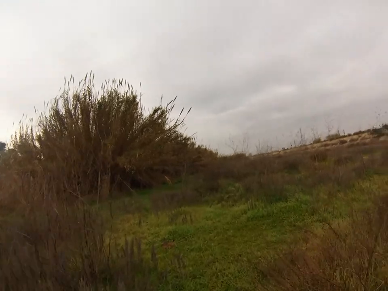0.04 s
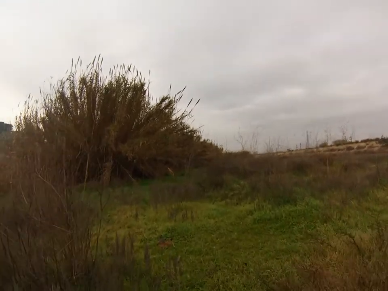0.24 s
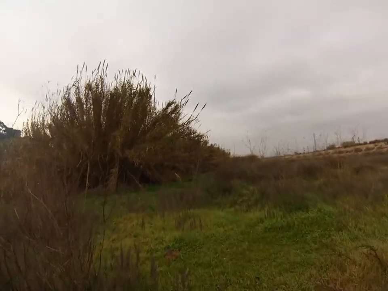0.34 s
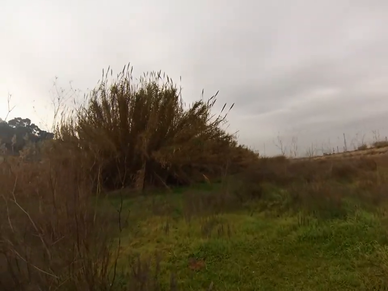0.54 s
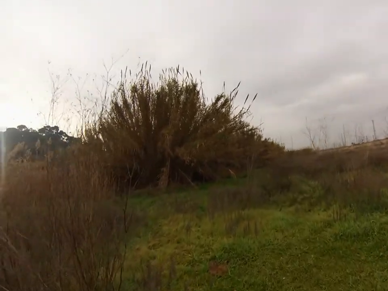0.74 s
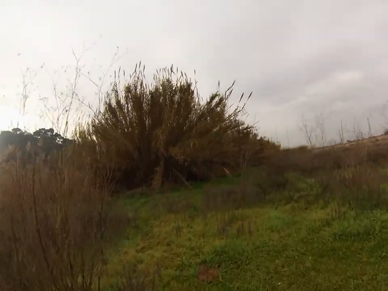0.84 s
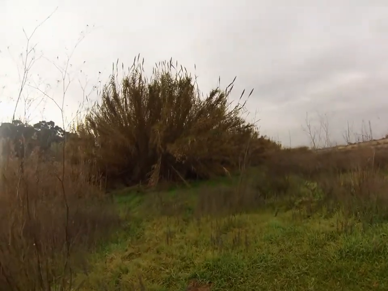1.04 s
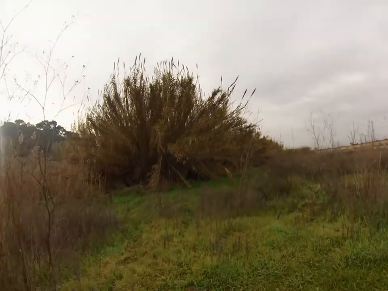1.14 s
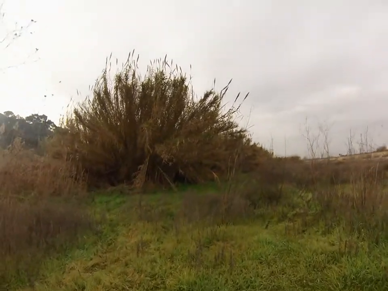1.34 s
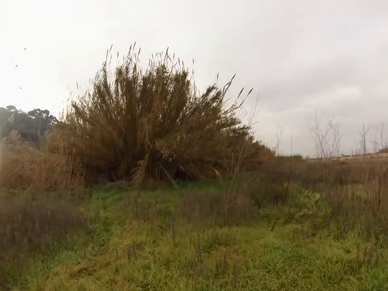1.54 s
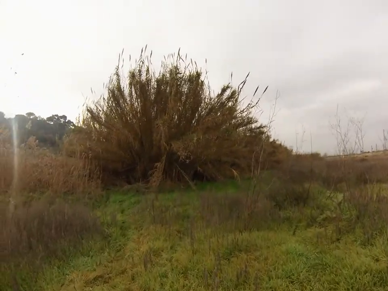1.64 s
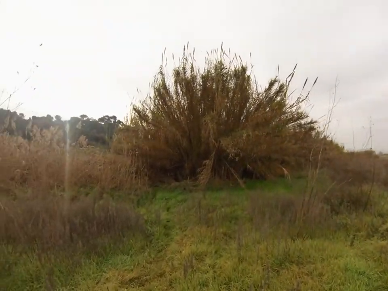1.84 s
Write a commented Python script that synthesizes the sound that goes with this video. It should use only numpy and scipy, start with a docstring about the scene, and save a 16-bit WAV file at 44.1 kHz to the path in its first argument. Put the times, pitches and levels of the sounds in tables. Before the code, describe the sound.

Soft wind rumbles on the microphone, swelling as someone walks slowly over grass in a quiet field. Dull bumps and light taps come from the handheld camera, then one sharp knock as the rumble dies down.

```python
"""Someone walks slowly over grass in a quiet field, carrying a small camera.
From the start, soft wind rumbles on the microphone over a faint, even hiss. With the first step the
grass swishes underfoot, the rumble swells with the sway, and the hand bumps dully on the camera's case.
Light taps then ring the case among further steps and bumps. Just after the last step comes one sharp
knock, and a few soft contacts follow as the rumble dies down."""
import sys
import numpy as np
from scipy import signal
from scipy.fft import rfft, irfft
from scipy.io import wavfile
from scipy.ndimage import uniform_filter1d

SR = 44100
rng = np.random.default_rng(int(sys.argv[2]) if len(sys.argv) > 2 else 0)


def dump(signal):
    """Clip the signal to [-1, 1] and save it as 16-bit WAV at the path in sys.argv[1]."""
    limited = np.clip(np.atleast_2d(signal).T, -1, 1)
    pcm = np.round(limited * 32767).astype(np.int16)
    wavfile.write(sys.argv[1], SR, pcm)


N = 83790


def amp(db):
    """The decibel scale: amplitude grows tenfold every 20 dB."""
    return 10 ** (np.asarray(db) / 20)


def unit(x):
    """Normalisation to an rms of 1."""
    return x / np.sqrt(np.mean(x ** 2) + 1e-20)


def add(mix, start_s, sound):
    """Superposition: a sound adds linearly to the mix from start_s on."""
    part = mix[max(round(start_s * SR), 0):][:len(sound)]
    part += sound[:len(part)]


def noise(spectrum):
    """An analytic noise signal of given spectrum: the real part is the sound, the modulus its envelope."""
    hz, db = np.transpose(spectrum)
    f = np.fft.rfftfreq(N, 1 / SR)
    white = rng.standard_normal(len(f)) + 1j * rng.standard_normal(len(f))
    gain = amp(np.interp(np.log(f + 1), np.log(hz + 1), db)) * (f > 0)
    analytic = np.fft.ifft(white * gain, N)
    return analytic / np.std(analytic.real)


def wander(hz):
    """Low-pass noise: a random drift of rms 1 that rolls off around hz."""
    f = np.fft.rfftfreq(N, 1 / SR)
    return unit(irfft(rfft(rng.standard_normal(N)) * np.exp(-(f / hz) ** 2), N))


def swell(peak_s, rise_s, fall_s):
    """A Gaussian envelope with separate widths before and after its peak."""
    t = np.arange(N) / SR - peak_s
    return np.exp(-(t / np.where(t < 0, rise_s, fall_s)) ** 2 / 2)


def eddies(spectrum):
    """Turbulent pressure of even strength: noise divided by its own smoothed envelope."""
    pressure = noise(spectrum)
    strength = np.sqrt(signal.fftconvolve(abs(pressure) ** 2, signal.windows.hann(SR // 16), "same"))
    return unit(pressure.real / strength)


def wind():
    """Turbulence on the microphone: a rumble swells with each stride, and each gust adds a push."""
    # buffeting by wind and sway: time_s, level_db
    buffet = [(0, -53), (.155, -53.5), (0.223, -21), (0.311, -31.5), (.36, -50.5), (.55, -51), (.65, -55.5),
              (.76, -43.5), (.825, -42), (0.879, -35), (.96, -33.5), (1.05, -38.5), (1.17, -56.5),
              (1.3, -50), (1.38, -46.5), (1.43, -49.5), (1.5, -34), (1.602, -30.5), (1.66, -52), (1.9, -60)]
    # spectrum of the deep rumble: frequency_hz, density_db
    rumble_spectrum = [(8, -7), (20, -0.5), (27, 0.5), (38, -14), (58, -36), (100, -41), (220, -59),
                       (500, -91.5)]
    # short gusts: peak_s, level_db, width_s, pitch_hz
    gusts = [(0.04, -50, 0.012, 48), (.105, -61, 0.012, 85.6), (.228, -37, 0.023, 49.5),
             (0.264, -50, 0.018, 44), (0.311, -61, 0.011, 72), (.396, -46, 0.012, 62),
             (0.499, -47.5, 0.021, 51.7), (0.741, -49, 0.0082, 52), (0.783, -47.5, 0.012, 57.3),
             (0.885, -34.5, 0.013, 47), (0.973, -43.5, 0.014, 51), (1.059, -47.5, 0.012, 65.4),
             (1.121, -48.5, 0.014, 50), (1.254, -59, 0.011, 75), (1.325, -51, 0.015, 51),
             (1.475, -42.5, 0.02, 47.3), (1.69, -60, .015, 55), (1.761, -59.5, 0.01, 65)]
    # spectrum of the turbulence in breeze and gusts: frequency_hz, density_db
    gust_spectrum = [(25, -10), (55, 1.5), (90, -1), (130, -9), (250, -18.5), (600, -26), (2000, -54)]
    breeze_db, turbulence_re_flow_db = -55.5, -14.5
    t, gusting = np.arange(N) / SR, np.zeros(N)
    rumble_db = uniform_filter1d(np.interp(t, *np.transpose(buffet)), size=600)
    out = amp(rumble_db) * eddies(rumble_spectrum)
    turbulence = eddies(gust_spectrum)
    for peak_s, level_db, width_s, pitch_hz in gusts:
        strength = amp(level_db) * swell(peak_s, width_s, width_s)
        phase = 2 * np.pi * (pitch_hz * (t - peak_s) + rng.random())
        out += strength * np.sqrt(2) * np.cos(phase)
        gusting += strength
    flow = np.hypot(amp(breeze_db), gusting)  # breeze and gusts add in power
    return out + amp(turbulence_re_flow_db) * flow * turbulence


def air():
    """The noise floor: still air and microphone hiss, with a slight flicker in level."""
    # spectrum of the background: frequency_hz, density_db
    spectrum = [(20, 0), (70, -4), (130, -7), (240, -13), (400, -18), (750, -20.5), (1200, -22),
                (2300, -24.5), (3300, -27.5), (7500, -32.5), (12300, -32.5), (13300, -38.5), (15000, -36)]
    level_db, flicker_db = -60.5, 0.66
    return noise(spectrum).real * amp(level_db + flicker_db * wander(hz=24.6))


def grass():
    """Friction noise: each step brushes the blades in a swish, with a scrape that sinks as it slows."""
    # steps: peak_s, rise_s, fall_s, level_db, scrape_re_swish_db, scrape_width_hz
    steps = [(.18, 0.052, 0.082, -62, -6.5, 430), (.9, 0.066, 0.07, -67.5, -13, 600),
             (1.14, 0.032, 0.037, -71, -15, 900), (1.525, 0.029, 0.02, -60, -2, 1300)]
    # spectrum of the swish: frequency_hz, density_db
    spectrum = [(250, 4), (520, -3), (820, -8), (1150, 1), (1500, -3), (1780, -11), (2100, 2), (2550, -6),
                (3100, -11.5), (5000, -17), (9000, -21.5), (14000, -49)]
    grain_db, grain_hz = 2, 155
    scrape_hz, slide_hz_per_s, scrape_length_ratio = 2223, 2500, 0.6
    t, out = np.arange(N) / SR, np.zeros(N)
    swish = unit(noise(spectrum).real * amp(grain_db * wander(grain_hz)))
    for peak_s, rise_s, fall_s, level_db, scrape_db, width_hz in steps:
        phase = 2 * np.pi * np.cumsum(scrape_hz - slide_hz_per_s * (t - peak_s)) / SR
        # random modulation in quadrature spreads the falling tone into a band of noise
        scrape = wander(width_hz / 2) * np.cos(phase) + wander(width_hz / 2) * np.sin(phase)
        scrape *= swell(peak_s, rise_s * scrape_length_ratio, fall_s * scrape_length_ratio)
        out += amp(level_db) * (swish * swell(peak_s, rise_s, fall_s) + amp(scrape_db) * scrape)
    return out


def scuffs():
    """Brief sliding friction: dry stems hiss in a high band, the sole on the ground in a low one."""
    # rubs of stems and sole: peak_s, level_db, width_s, centre_hz
    rubs = [(.171, -69, 0.0056, 5900), (.955, -74.5, .02, 7500), (0.976, -62.5, 0.0058, 660),
            (1.63, -64, 0.0071, 690)]
    edge_db = 13  # drop one octave from the centre
    out = np.zeros(N)
    for peak_s, level_db, width_s, centre_hz in rubs:
        band = [(centre_hz * 2 ** octave, -edge_db * octave ** 2) for octave in np.linspace(-2, 2, 9)]
        out += amp(level_db) * swell(peak_s, width_s, width_s) * noise(band).real
    return out


def bumps():
    """Heavily damped oscillation: each push of the hand on the case dies within a cycle or two."""
    # pushes of the hand: start_s, level_db, pitch_hz
    pushes = [(.224, -42, 129), (.24, -44, 156), (.388, -44, 94), (.389, -45.5, 220), (.3895, -49, 560),
              (0.403, -56, 120), (0.728, -39, 157), (.774, -47, 288), (.866, -40.5, 163), (.888, -44, 186),
              (.974, -45.5, 348), (1.06, -43.5, 177), (1.491, -42, 156), (1.633, -37, 119)]
    rise_s, decay_cycles = 0.00083, 0.66
    t, out = np.arange(SR // 10) / SR, np.zeros(N)
    for start_s, level_db, pitch_hz in pushes:
        envelope = (1 - np.exp(-t / rise_s)) * np.exp(-t * pitch_hz / decay_cycles)
        add(out, start_s, amp(level_db) * envelope * np.sin(2 * np.pi * pitch_hz * t))
    return out


def taps():
    """Modal resonance: a blow and its chatter ring the case, damped more or less by the grip."""
    # modes of the case: frequency_hz, level_db, nominal_t60_s
    modes = [(300, -33, 0.042), (568, -21.5, 0.02), (814, -29.5, 0.043), (1052, -27.5, 0.03),
             (1232, -7, 0.011), (1550, -9.5, 0.014), (2040, -10, 0.013), (2154, -7.5, 0.01),
             (2436, -10, 0.015), (2830, -18.5, 0.026), (3500, -14, 0.0098), (3740, -12.5, 0.022),
             (4900, -8, 0.0098), (6000, -2, 0.0045)]
    # blows on the case: start_s, gain_db, brightness_hz, chatter_ratio, ring_time_ratio
    blows = [(0.3884, -45.5, 2200, 0.36, 1), (0.3899, -37.5, 1450, 0.08, 1.5), (.408, -56, 1410, 1.1, 1),
             (.495, -47, 2120, .4, 1), (0.4957, -47, 1300, .1, 1.6), (0.5005, -46.5, 1500, 0.82, 1.2),
             (.891, -49, 900, 0.94, 0.62), (.974, -47, 840, 1.5, .7), (1.051, -50.5, 1590, 1.4, 1.3),
             (1.0635, -46, 1670, 0.83, 1), (1.165, -53, 1400, 1.6, 0.84), (1.352, -57, 1600, 0.43, 1),
             (1.5739, -23, 1400, 0.018, 1.15), (1.5749, -17.5, 2240, .02, 0.95),
             (1.626, -44.5, 1880, 1.06, 0.62), (1.736, -57.5, 2400, 1.2, 1)]
    chatter_s = 0.0054
    tick_db, tick_hz, tick_s = -30, 5540, 0.00019  # the tick of first contact
    t, out = np.arange(SR // 16) / SR, np.zeros(N)
    tick = t / tick_s * np.exp(1 - t / tick_s) * np.sin(2 * np.pi * tick_hz * t)
    for start_s, gain_db, brightness_hz, chatter_ratio, ring_time_ratio in blows:
        ring = sum(amp(mode_db - 60 * t / (t60_s * ring_time_ratio)) * np.cos(2 * np.pi * hz * t)
                   for hz, mode_db, t60_s in modes)
        force = rng.standard_normal(len(t)) * np.exp(-t / chatter_s)
        force *= chatter_ratio / np.linalg.norm(force)
        force[0] += 1  # the blow itself, a unit impulse
        # a softer contact passes less treble and gives a weaker tick
        contact = signal.butter(5, brightness_hz, fs=SR, output="sos")
        add(out, start_s, amp(gain_db) * signal.sosfilt(contact, signal.fftconvolve(force, ring)))
        add(out, start_s, amp(gain_db + tick_db) * brightness_hz / tick_hz * tick)
    return out


def scene():
    """Free-field superposition: the close sources add in one channel, without reverberation."""
    return (wind() + air() + grass() + scuffs() + bumps() + taps())[None]


def record(dry):
    """Band limiting: the camera's low-pass filter removes the highest treble."""
    edge_hz = 15150
    low_pass = signal.firwin(511, edge_hz, window=("kaiser", 9), fs=SR)
    return signal.oaconvolve(dry, low_pass[None], "same")


dry = scene()
out = record(dry)
dump(out)
```